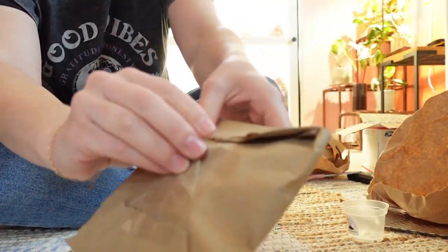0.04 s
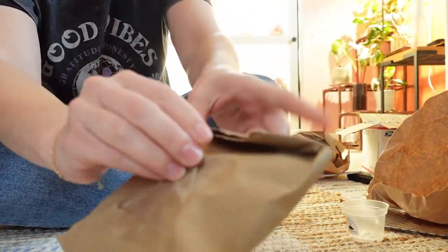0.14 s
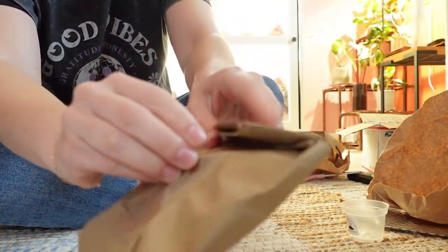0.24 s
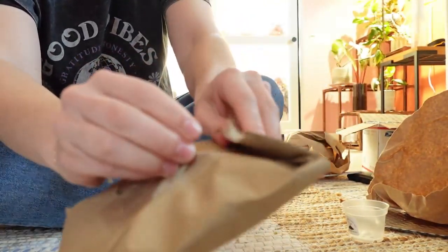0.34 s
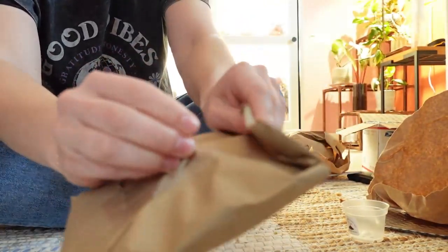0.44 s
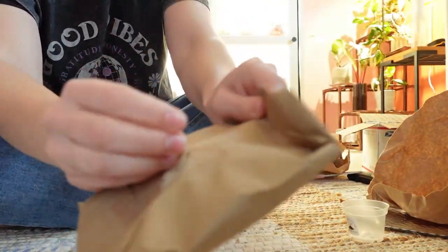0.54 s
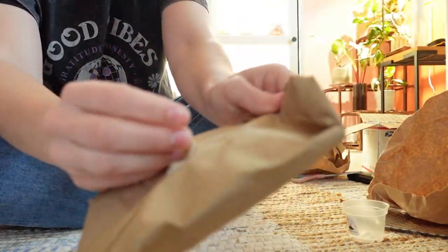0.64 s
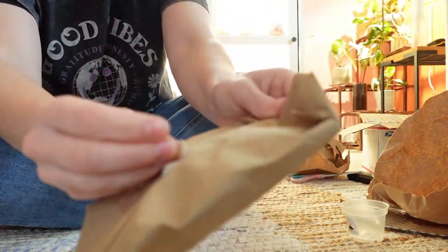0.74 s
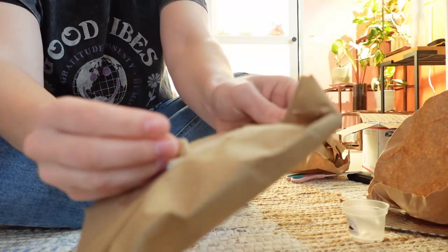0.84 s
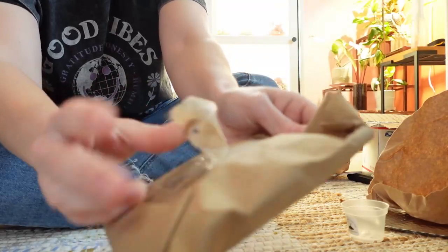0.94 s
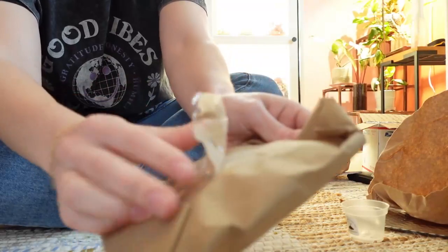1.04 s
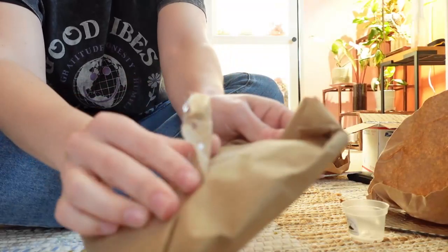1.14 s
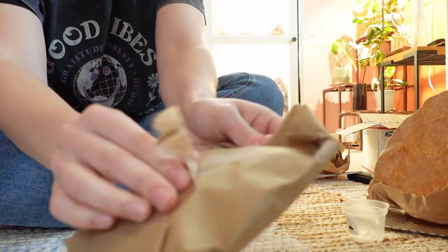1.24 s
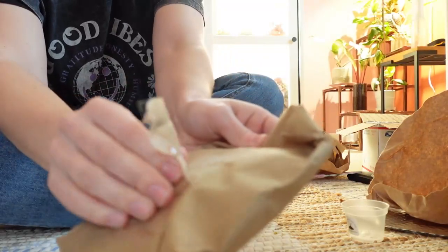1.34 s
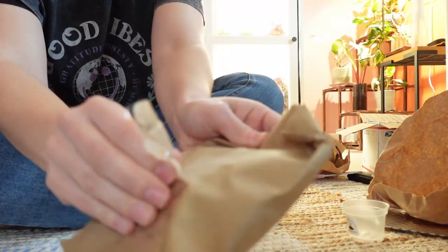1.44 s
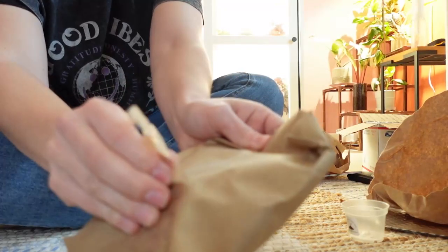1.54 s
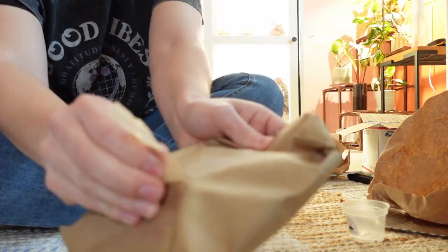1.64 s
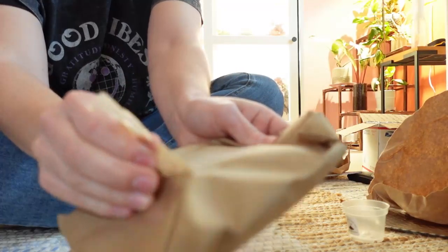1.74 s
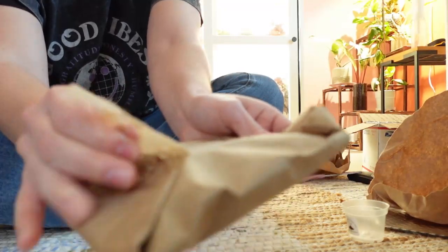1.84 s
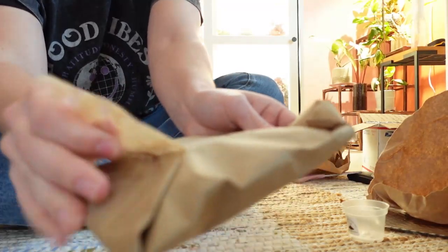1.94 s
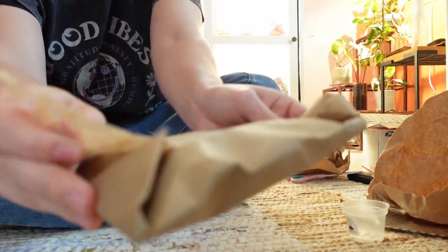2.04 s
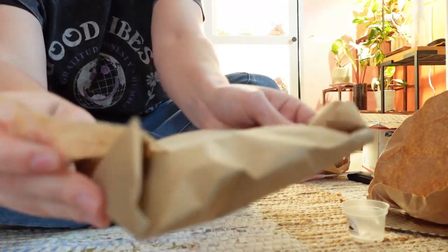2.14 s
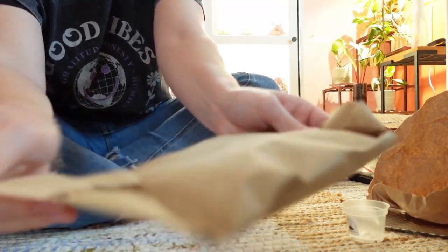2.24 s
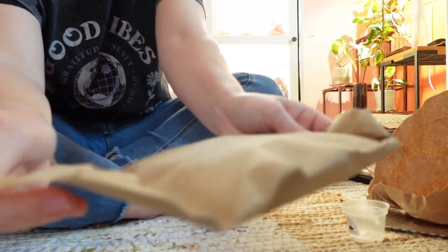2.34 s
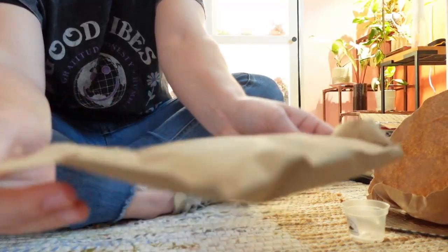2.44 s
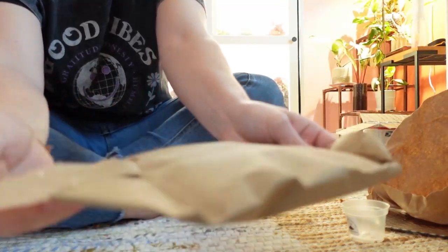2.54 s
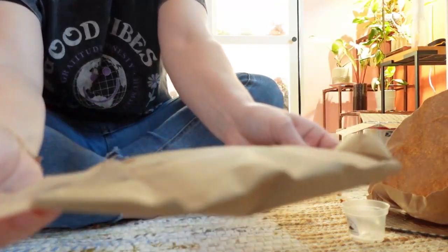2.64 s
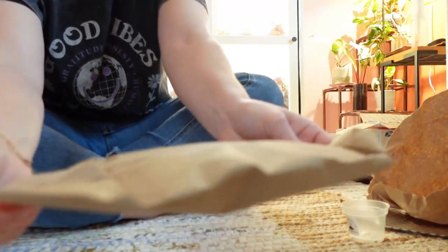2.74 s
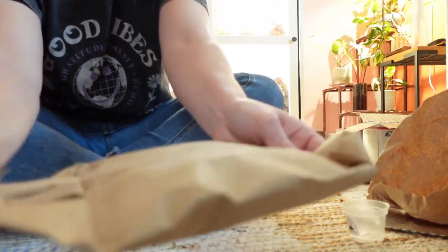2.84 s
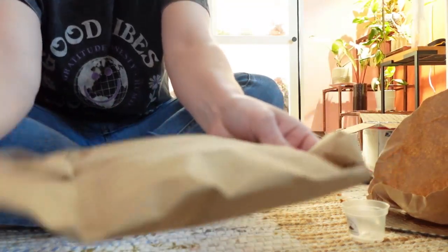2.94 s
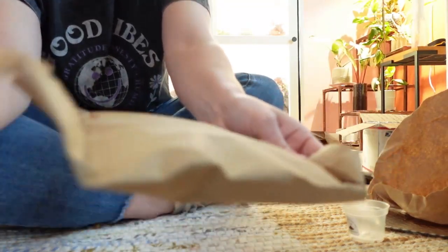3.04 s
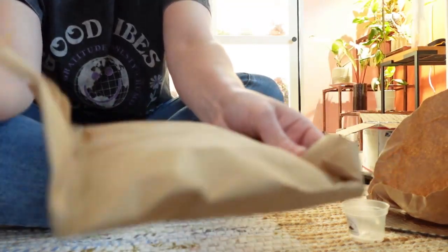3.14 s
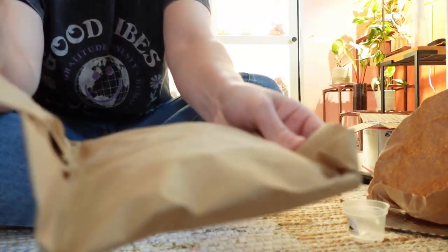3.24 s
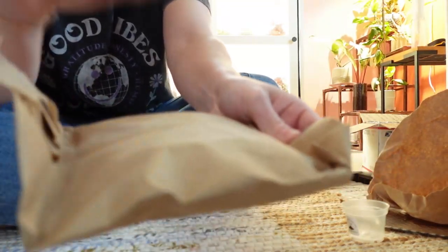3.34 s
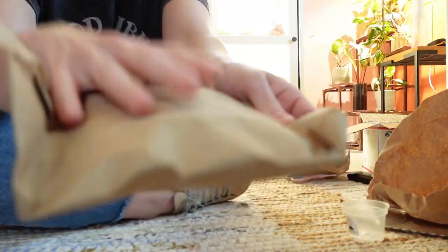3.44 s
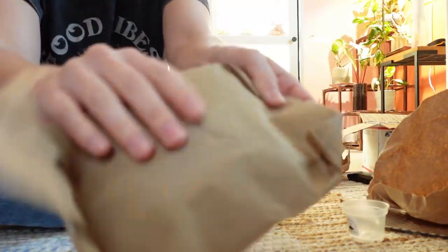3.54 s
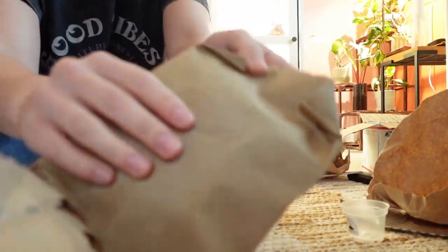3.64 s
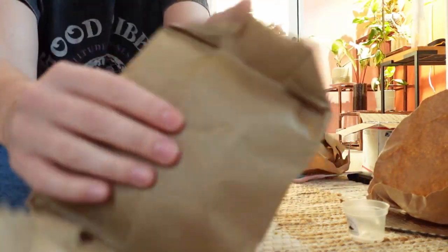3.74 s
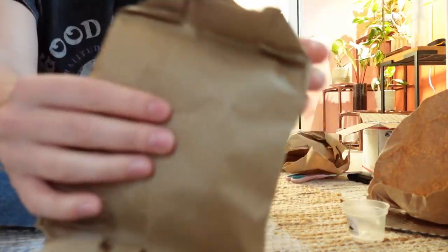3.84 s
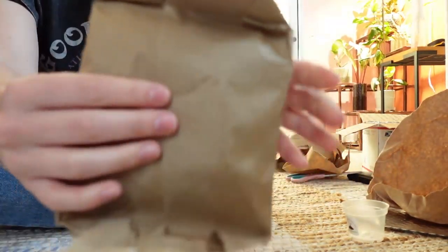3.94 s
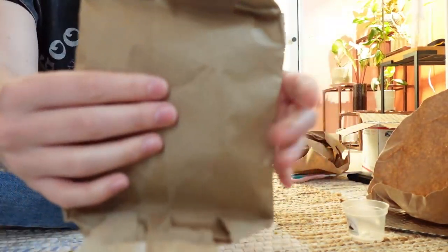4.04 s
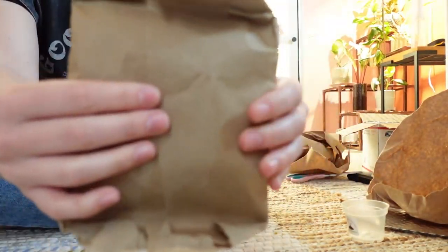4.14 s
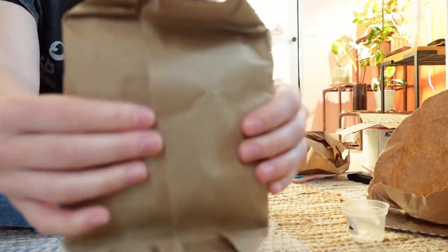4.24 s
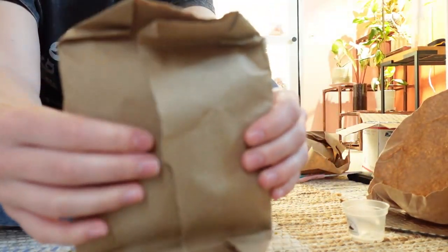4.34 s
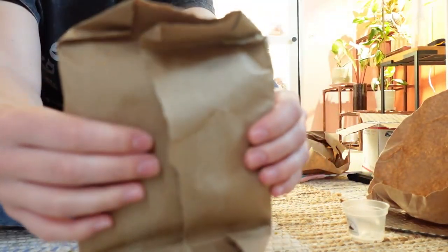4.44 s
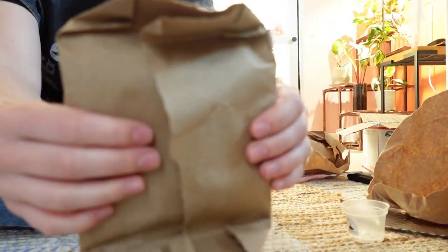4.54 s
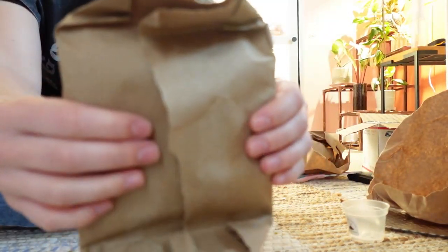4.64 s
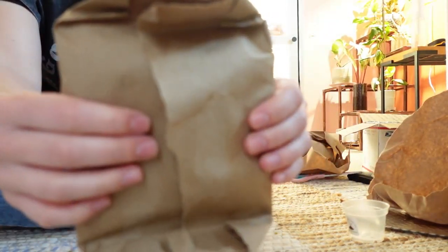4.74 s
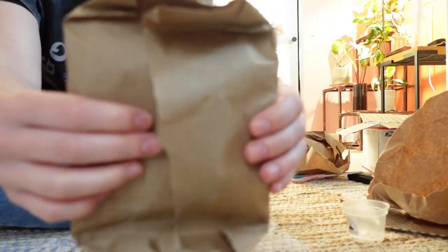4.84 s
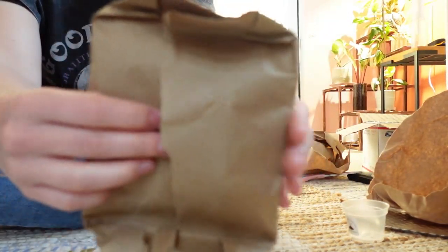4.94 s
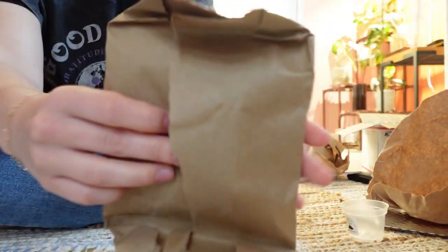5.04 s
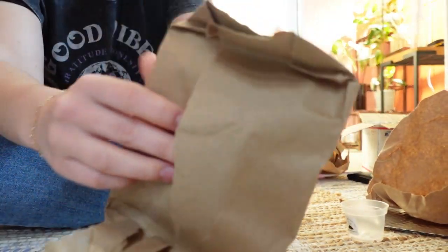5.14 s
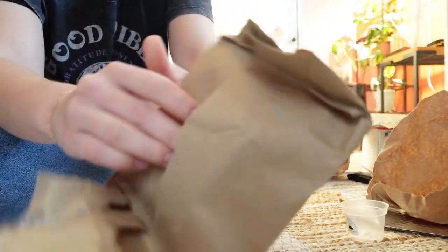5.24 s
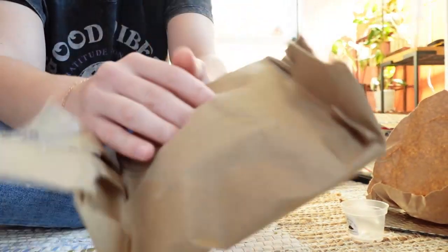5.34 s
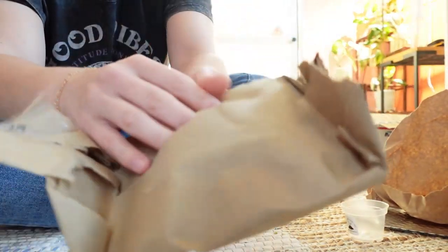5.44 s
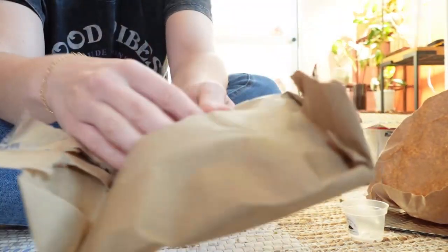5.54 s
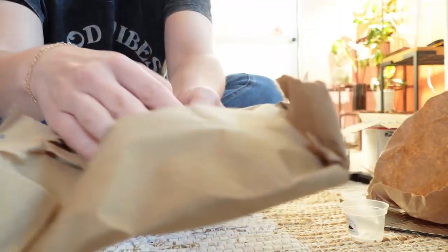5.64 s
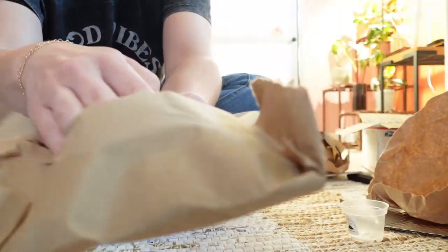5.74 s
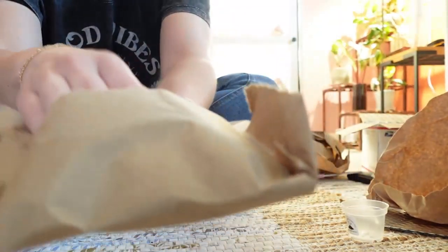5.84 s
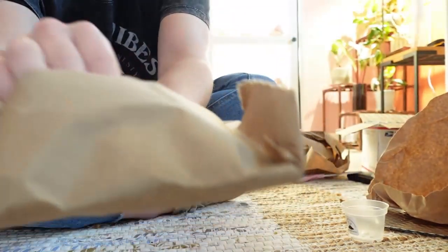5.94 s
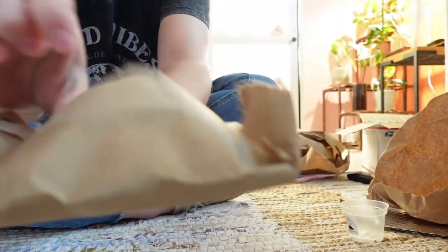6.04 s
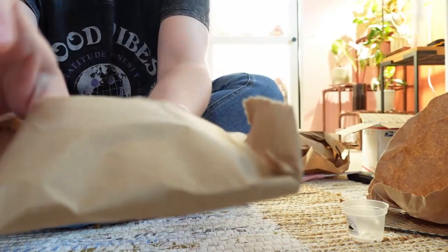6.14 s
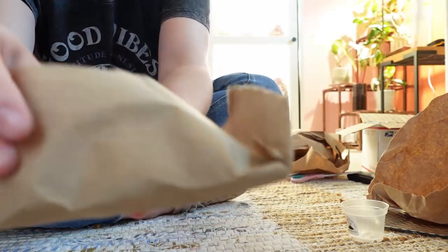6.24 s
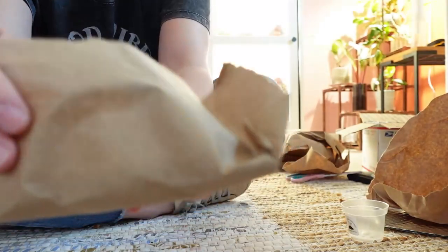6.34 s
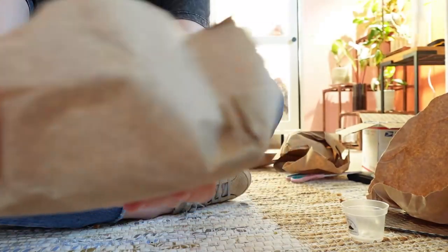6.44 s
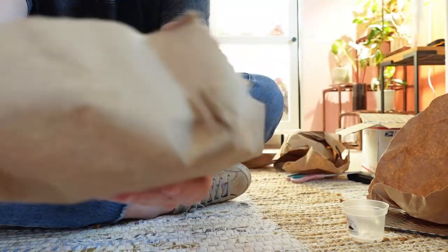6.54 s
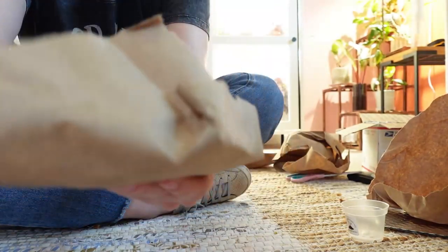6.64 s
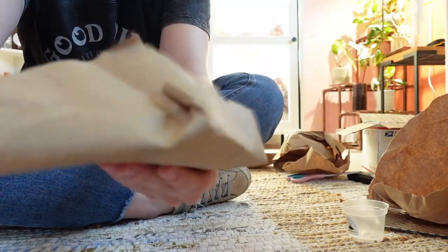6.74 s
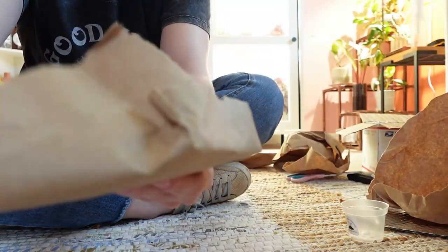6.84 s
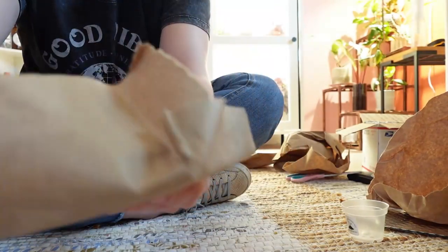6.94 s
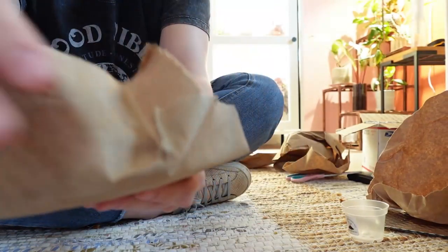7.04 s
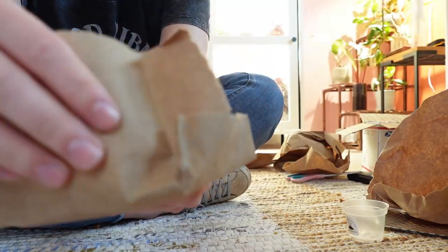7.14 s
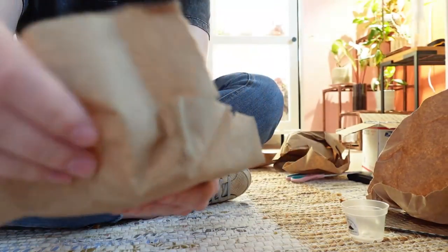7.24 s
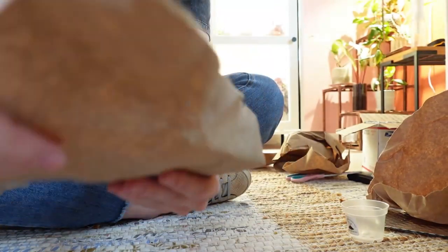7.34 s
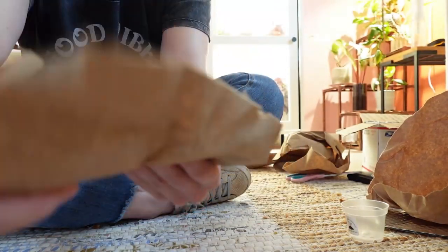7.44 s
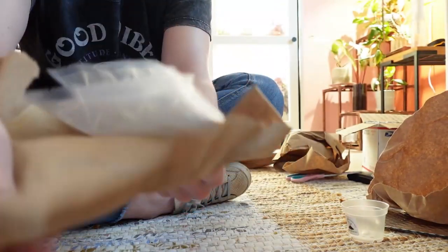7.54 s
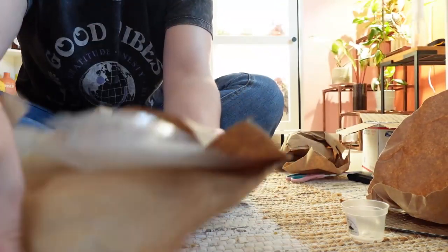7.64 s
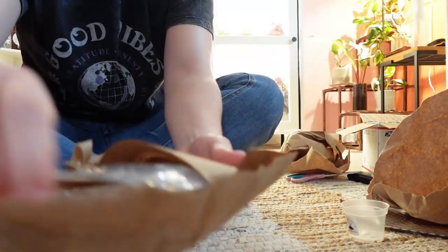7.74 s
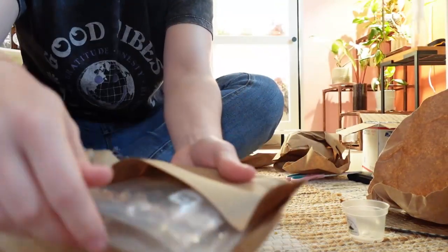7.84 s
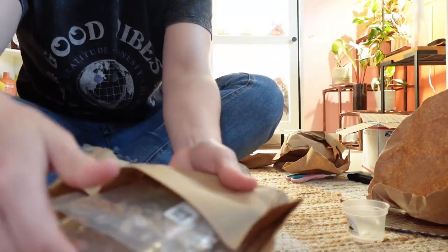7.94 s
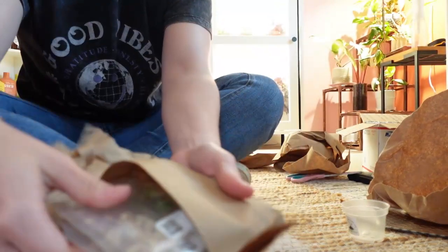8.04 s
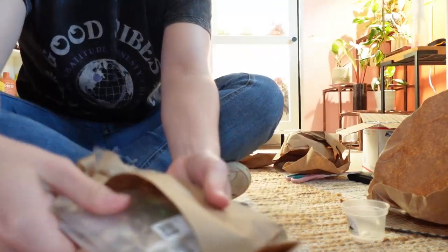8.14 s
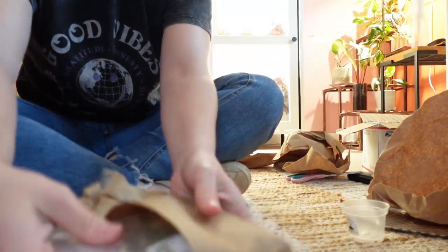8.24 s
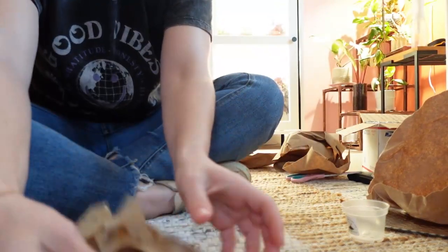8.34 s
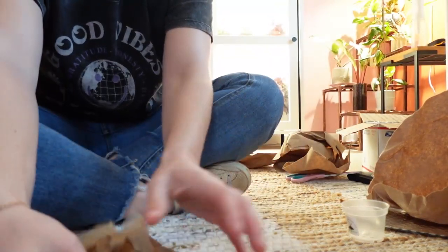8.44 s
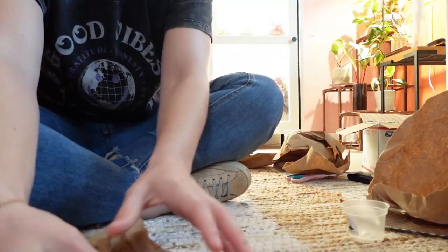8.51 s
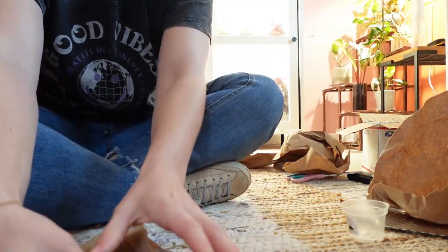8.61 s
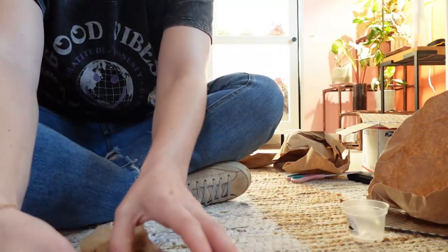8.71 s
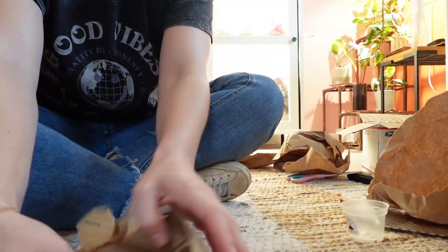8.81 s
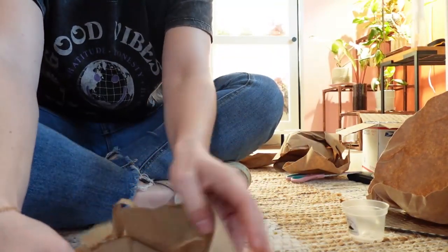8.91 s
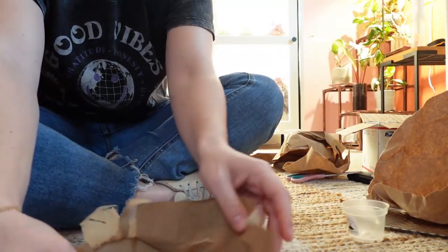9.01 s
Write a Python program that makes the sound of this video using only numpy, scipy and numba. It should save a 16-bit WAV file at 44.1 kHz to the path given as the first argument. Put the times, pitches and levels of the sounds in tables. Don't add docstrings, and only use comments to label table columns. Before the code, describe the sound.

A stiff paper bag crackles loudly close by as hands unfold it, rip off its tape, squeeze, open and lay it down indoors.

```python
import sys
import numpy as np
from scipy import signal
from scipy.fft import rfft, irfft, next_fast_len
from scipy.io import wavfile
from scipy.ndimage import uniform_filter1d
from numba import njit

SR = 44100
rng = np.random.default_rng(int(sys.argv[2]) if len(sys.argv) > 2 else 0)


def inscribe(sig):
    pcm = np.round(np.clip(np.atleast_2d(sig).T, -1, 1) * 32767)
    wavfile.write(sys.argv[1], SR, pcm.astype(np.int16))


def level_to_linear(level):
    exponent = np.asarray(level, float) / 20
    return 10 ** exponent


N = 400016


def snaps():
    s, peak_db, pitch_hz = creases()
    sounds = buckle(pitch_hz, focus_db=13, crisp_db=2.0, run_ms=1.2, ring=0.66, size=640)
    outline = np.sqrt(uniform_filter1d(abs(signal.hilbert(sounds)) ** 2, size=44))
    loudest, height = outline.argmax(1), outline.max(1)

    width_s = 0.031 / np.minimum(pitch_hz / 4.5, 1000)[:, None]
    u = (np.arange(640) - loudest[:, None]) / SR / width_s
    force = height * rng.uniform(-1, 1, len(s))
    sounds = sounds + 2 * force[:, None] * (1 - u ** 2) * np.exp(-u ** 2 / 2)

    starts = np.maximum(np.round(s * SR).astype(int) - loudest, 0)
    out = np.zeros(N)
    add(out, starts, level_to_linear(peak_db - 1.5) / height, np.arange(len(s)), sounds)
    return out


# time in seconds, peak level in dB, pitch of the paper patch in Hz.
EARLY_CREASES = [(0.0396, -10, 5240), (0.077, -9.5, 2040), (0.095, -20.5, 2900), (0.1039, -2, 5250),
                 (0.116, -28, 2900), (0.122, -7.5, 5400), (0.1452, -5.5, 2810), (0.2133, -2, 1775),
                 (0.2173, -8, 4900), (0.235, -14.5, 4100), (0.2822, -5.5, 6490), (0.306, -5, 4720),
                 (0.327, -8, 3080), (0.3867, -8.5, 1697), (0.4168, -11.5, 1700), (0.4465, -13.5, 2670),
                 (0.4677, -10, 2626), (0.5347, -6, 4130), (0.573, -6, 3460), (0.5997, -11.5, 3940),
                 (0.6184, -11.5, 1390), (0.627, -5.5, 5500), (0.6763, -6, 3120), (0.6835, -7.5, 2440),
                 (0.7181, -5, 3675), (0.8307, -9, 1140), (0.8884, -12.5, 3440), (0.9113, -8, 4770),
                 (0.9341, -12.5, 1950), (0.9519, -9, 1670), (0.9605, -6.5, 2840), (0.968, -19, 2160),
                (0.981, -10, 4160), (1.0014, -8, 2400), (1.0756, -6.5, 4395), (1.091, -20, 1610),
                (1.117, -26, 2750), (1.1273, -7.5, 2970), (1.2232, -12, 2370), (1.2697, -15.5, 1704),
                (1.326, -11, 6910), (1.333, -14, 4830), (1.3756, -13, 3220), (1.435, -19.5, 6400),
                (1.4792, -6.5, 1660), (1.507, -18.5, 1590), (1.5344, -6.5, 2780), (1.6198, -10, 4570),
                (1.64, -4, 4800), (1.643, -1.5, 3560), (1.663, -6, 5050), (1.739, -6.5, 2290),
                (1.768, -2.5, 5380), (2.411, -10, 3065), (2.422, -2, 4930), (2.443, -8.5, 4700),
                 (2.4574, -10.5, 1410), (2.542, -16, 1626), (2.5932, -13.5, 9450), (2.632, -13.5, 1830),
                  (2.659, -13.5, 4050), (2.696, -4.5, 4570), (2.7505, -9, 2716), (2.791, -16, 3730),
                  (2.827, -7.5, 3304), (2.885, -12, 2600), (2.8979, -7.5, 1963), (2.9556, -13.5, 2320),
                  (2.9749, -6.5, 3020), (3.0178, -8, 3650), (3.0312, -8.5, 1325), (3.151, -11.5, 2444),
                  (3.167, -7.5, 3700), (3.188, -7.5, 5120), (3.192, -4.5, 3580), (3.212, -2.5, 6500),
                  (3.493, -25, 6430), (3.536, -9, 2180), (3.603, -7.5, 2980), (3.6303, -4, 2950),
                  (3.65, -10, 1920), (3.6732, -3.5, 4260), (3.676, -10, 3370), (3.69, -6, 3840),
                  (3.725, -10.5, 2414),
                 (3.7501, -4, 2358), (3.7775, -5.5, 3080), (3.793, -6, 2760), (3.8344, -3, 3950),
                   (3.841, -5.5, 3260), (3.985, -16.5, 3720), (4.0366, -16, 3830), (4.074, -21, 3090),
                   (4.2203, -8, 4580), (4.2476, -7.5, 2860), (4.287, -8, 3300), (4.3002, -7, 2710),
                   (4.3306, -7, 2940), (4.3609, -7.5, 2920), (4.4466, -15.5, 3200), (4.533, -11.5, 2000),
                   (4.8037, -12, 2306), (4.8563, -17, 3000), (4.88, -11.5, 2900), (4.912, -8, 3534),
                   (4.9274, -8.5, 3385), (4.943, -4, 4300), (5.032, -11.5, 1820), (5.0535, -14, 1720),
                   (5.1386, -7.5, 2900), (5.156, -8, 3180), (5.1643, -7, 3390), (5.2605, -13, 2000),
                   (5.311, -13, 2930), (5.3396, -4.5, 3567)]
LATE_CREASES = [(5.364, -9.5, 2960), (5.383, -15.5, 2280), (5.4, -12, 3230), (5.5783, -8.5, 1990),
                (5.619, -10.5, 1890), (5.679, -6, 2584), (5.686, -6, 2610), (5.8246, -1.5, 4440),
                (5.838, -5, 2724), (5.8676, -1.5, 2910), (5.9529, -13, 1166), (6.0869, -3, 1230),
                (6.264, -4.5, 2730), (6.37, -6.5, 1690), (6.4323, -1, 1580), (6.511, -3.5, 2880),
                (6.558, -1, 3360), (6.6689, -1, 1510), (6.704, -2.5, 1995), (6.742, -2.5, 1904),
                (6.803, -7, 1720), (6.8826, -7, 2010), (6.8876, -6, 1760), (6.936, -2.5, 1868),
                (6.9565, -13.5, 2180), (7.0994, -9.5, 1840), (7.107, -7, 4050),
                (7.1538, -2, 1770), (7.2008, -5, 1756), (7.2426, -1.5, 1630), (7.253, -1.5, 3180),
                 (7.286, -10, 2050), (7.3094, -4.5, 2806), (7.364, 0, 2987), (7.4, -4.5, 1590),
                 (7.416, -6.5, 4410), (7.4898, -3.5, 3440), (7.5461, -8.5, 5470), (7.601, -12, 1724),
                 (7.6305, -6.5, 4300), (7.6492, -7, 4550), (7.6586, -4.5, 2335), (7.667, -9, 3970),
                 (7.686, -3, 2415), (7.7208, -5.5, 2046), (7.7313, -5, 2286), (7.8201, -6.5, 2510),
                 (7.957, -16.5, 3600), (7.977, -15.5, 1720), (8.029, -6.5, 3770),
                (8.051, -1, 2580), (8.0733, -8, 3120), (8.092, -7, 2300), (8.1155, -6.5, 3300),
               (8.156, 2.5, 2150), (8.1838, -0.5, 2150), (8.258, -9, 2090), (8.2638, -2.5, 3580),
               (8.2962, -8.5, 3320), (8.328, -8, 3160), (8.437, -6.5, 1895), (8.483, -2, 1630),
               (8.5149, -7, 3100), (8.574, -15.5, 2930), (8.6513, -14, 4550), (8.673, -14, 5090),
               (8.718, -13.5, 2420), (8.7394, -12.5, 2250), (8.768, -16.5, 1096), (8.772, -15.5, 3260),
               (8.819, -15, 1950), (8.903, -9, 1890), (8.931, -5.5, 2940), (8.9351, -5.5, 2550),
               (9.0024, -9, 2720), (9.052, -5, 4600)]
MORE_CREASES = [(0.0091, -12.5, 2135), (0.0209, -12, 2490), (0.035, -7, 4330), (0.064, -9.5, 2930),
                (0.139, -9, 4785), (0.182, -26, 2520), (0.188, -19, 2480), (0.241, -10, 7030),
                (0.2475, -6, 4080), (0.288, -21, 5080.0), (0.3335, -15, 8400), (0.399, -27, 1900),
                (0.402, -22.5, 4870), (0.5053, -14, 3430), (0.5866, -8, 6910), (0.6148, -2.5, 5180),
                (0.636, -5, 4950), (0.6572, -6, 6410), (0.7776, -14.0, 7350), (0.9437, -7.5, 6400),
                (0.992, -30, 7990), (1.0277, -17.5, 6200), (1.1027, -17, 2210), (1.1132, -27, 2720),
                (1.194, -21.5, 3040), (1.233, -19, 2930), (1.258, -27.5, 3970.0), (1.279, -19, 3580),
                (1.2854, -28, 5800), (1.2941, -15, 8020), (1.3, -25.5, 5770.0), (1.3187, -25.5, 6670.0),
                (1.3875, -30, 7260.0), (1.4058, -26, 1870), (1.464, -14.5, 3210.0), (1.562, -11.5, 6020),
                (1.6502, -8, 6770), (1.7331, -6, 6200), (1.794, -5.5, 4220), (1.9304, -18, 4200),
                (2.089, -7, 1320), (2.398, -5, 3380), (2.4647, -17.5, 2380), (2.469, -19.5, 2630.0),
                (2.5508, -23.5, 2160), (2.5858, -34, 5430), (2.672, -7, 6460), (2.7232, -10.5, 4820),
                (2.7275, -17.5, 3320.0), (2.7808, -13.5, 3000), (2.8928, -22.5, 4270),
                (2.9108, -13, 2750.0), (2.9638, -16, 6940), (2.966, -15.5, 7600), (3.0243, -19.5, 4530),
                        (3.0439, -11.5, 3060), (3.0826, -27, 6850), (3.1018, -26, 3780), (3.1237, -34.5, 5030.0),
                        (3.1379, -14, 2820.0), (3.456, -29, 5550), (3.5438, -7, 5220), (3.556, -7.5, 3330),
                        (3.588, -9.5, 5660), (3.6426, -12, 4400), (3.704, -24, 4890.0), (3.7855, -21, 3940),
                        (3.8127, -14.0, 4260), (4.011, -23.5, 4590), (4.0676, -31, 1320), (4.135, -25, 5830),
                        (4.1417, -33, 4020.0), (4.2354, -11, 2910), (4.241, -18.5, 3470), (4.31, -6.5, 3710),
                        (4.49, -21.5, 1740), (4.5557, -27.5, 2030), (4.5928, -25.0, 2620), (4.6065, -31.5, 4700),
                        (4.6286, -38, 5070), (4.6399, -37.5, 1630), (4.6484, -38.5, 3110.0), (4.9602, -16, 3930),
                        (5.0876, -25.5, 1800), (5.109, -21.5, 2950), (5.121, -18.5, 3500), (5.2046, -15.5, 1280),
                        (5.2168, -16.5, 2600), (5.232, -16.5, 1510), (5.2367, -13.5, 1406), (5.2492, -29.5, 4640),
                        (5.276, -18, 3190), (5.2917, -24.5, 2360), (5.2976, -21.5, 3670), (5.356, -26, 3500),
                        (5.4498, -23, 2940), (5.5897, -8, 2526), (5.6647, -14.5, 4090.0), (5.7249, -12.5, 1970),
                        (5.744, -10, 3780), (6.0268, -20, 4000), (6.331, -9.5, 2440), (6.358, -10, 9950),
                        (6.373, -8, 6820), (6.449, -11.5, 3270.0), (6.4907, -5, 3940),
                (6.532, -7.5, 1456), (6.5527, -4, 3630), (6.5745, -10, 1960), (6.611, -9.5, 1480),
                         (6.6345, -4.5, 4620), (6.711, -8.5, 3820.0), (6.7277, -2, 2710), (6.7489, -3.5, 3610),
                         (6.825, -4.5, 4830), (6.874, -12, 2203), (6.948, -13.5, 1646), (6.954, -12.5, 2980),
                         (7.1191, -9.5, 3350), (7.192, -8, 3050), (7.2123, -13, 2267), (7.2343, -19.5, 3570),
                         (7.2476, -8, 4300), (7.259, -36, 3430), (7.339, -3.5, 6080), (7.346, -18, 4660),
                         (7.3592, -6, 4820), (7.3913, -6, 2820), (7.406, -2.5, 3660), (7.4401, -1.5, 3824),
                         (7.469, -23, 3600), (7.473, -2.5, 6460), (7.5114, -2, 4435), (7.6137, -8.5, 2860),
                         (7.642, 2, 5390), (7.7677, -8.5, 4860), (7.777, -7.5, 2900), (7.889, -19, 7440),
                         (7.902, -26.5, 6840), (7.9164, -13.5, 3600), (7.939, -14, 5580.0), (7.993, -13, 3850),
                         (8.0097, -21.5, 4960), (8.048, -8, 4870), (8.057, -5, 3750), (8.101, -14, 2520),
                         (8.1325, -13.5, 5280), (8.2479, -11.5, 3710), (8.3153, -25.5, 2460), (8.345, -14, 3984),
                         (8.3746, -18.5, 5710), (8.403, -17.5, 2715), (8.4574, -9, 2990), (8.493, -6, 2494),
                         (8.567, -28, 2940), (8.943, -15, 3930), (8.99, -17, 6100), (9.0173, -12.5, 6030),
                         (9.0378, -12.5, 3040), (9.06, -21, 3300)]


def creases():
    picks = EARLY_CREASES
    picks = picks + LATE_CREASES
    return np.transpose(picks + MORE_CREASES)


# pitch in Hz, level in dB per Hz.
SHEET_COLOUR = [(88, -47), (150, -23.5), (425, -6.5), (477, -13), (578, -5.5), (972, -0.5), (1540, 2),
                (5200, -3.5), (15000, -16.5)]
# pitch in Hz, time to fade by 60 dB in milliseconds.
SHEET_RING = [(200, 54), (1000, 14.86), (3000, 9.2), (8000, 8.6), (16000, 6.1)]


def buckle(pitch_hz, focus_db, crisp_db, run_ms, ring, size):
    place, wait, weak, phase = np.moveaxis(rng.random((len(pitch_hz), 40, 4)), 2, 0)[..., None]
    hz = 16000 * ((np.arange(40)[:, None] + place) / 40) ** 2 + 120
    pitch_hz = pitch_hz[:, None, None]

    late = 2 * wait - 0.8
    run_s = run_ms / pitch_hz * 2 * (0.3 + weak[:, :1])
    t = np.maximum(np.arange(size) / SR - run_s * (late ** 3 + 0.8 ** 3), 0)

    octaves = np.log2(hz / pitch_hz)
    patch_db = focus_db * np.exp(-(octaves / 0.36) ** 2)
    tilt_db = crisp_db * np.log2(pitch_hz / 2500) * np.log2(hz / 2500)
    tilt_db = tilt_db - 4.8 * np.maximum(octaves - 1, 0) ** 2
    tilt_db = tilt_db - 2.5 * np.clip(-octaves - 0.6, 0, 2)

    sheet_db = read(SHEET_COLOUR, hz) + 7.8 * np.log10(hz)
    height_db = sheet_db + patch_db + tilt_db - 10 * weak - 9 * abs(late)
    fade_db = 60000 * t / (ring * read(SHEET_RING, hz))
    onset = np.minimum(t * hz * 0.88, 1)
    tones = level_to_linear(height_db - fade_db) * onset * np.sin(2 * np.pi * (hz * t + phase))
    return tones.sum(1)


def rustle():
    level_db, crisp = handling()
    grain = graininess(level_db)
    slips_per_s = 3600
    clump = level_to_linear((0.6 + 1.6 * grain) * drift(hz=40))
    luck, picks = rng.random((N, 2)).T
    size_db = level_db - 7.0 * grain - 3.7 * grain * np.log(picks + 0.0023)
    size = level_to_linear(size_db) * clump * np.sqrt(SR / slips_per_s)
    starts = np.flatnonzero(luck < slips_per_s / SR)

    stock_hz = np.geomspace(500, 13000, 500)
    sounds = buckle(stock_hz, focus_db=4.5, crisp_db=2.0, run_ms=1.451, ring=0.73, size=500)
    sounds /= np.linalg.norm(sounds, axis=1)[:, None]

    octaves = 0.35 * crisp + 0.15 * np.log(picks) + 0.8 * rng.standard_normal(N)
    kinds = np.searchsorted(stock_hz, 3400 * 2 ** octaves).clip(0, len(sounds) - 1)
    signed_size = size * rng.choice([-1, 1], N)
    out = np.zeros(N)
    add(out, starts, signed_size[starts], kinds[starts], sounds)
    return out


# full strength at seconds, held for seconds, rustle level in dB, crispness from dull (-1) to crisp (4).
MOVES = [(0.01, 0.14, -25.5, 2), (0.232, 0.2, -26.5, 2), (0.526, 0.19, -24, 2),
         (0.622, 0.01, -20.5, 2.5), (0.786, 0.041, -18.5, 3.5), (0.958, 0.02, -25, 3),
         (1.089, 0.07, -36, 1), (1.232, 0.049, -32, 1.2), (1.375, 0.037, -39.5, 3.5),
         (1.452, 0.061, -31, 3), (1.545, 0.712, -28, 2.5), (1.652, 0.084, -20.5, 3),
         (1.817, 0.097, -17.5, 2.2), (1.989, 0.14, -16, 3.5), (2.185, 0.15, -15, 2.5),
         (2.419, 0.0047, -30.5, 0), (2.544, 0.015, -35.5, 1.3), (2.676, 0.038, -22.5, 2),
         (2.827, 0.03, -38, 1), (2.903, 0.016, -28, 1), (2.958, 0, -29, 2), (3.037, 0, -26.5, 1.35),
         (3.134, 0.036, -33, -1.1), (3.208, 0.0, -27.5, 4), (3.424, 0.18, -48, 3.5),
         (3.562, 0.014, -21.5, 3), (3.625, 0.02, -24, 1.5), (3.713, 0.053, -28.5, 2),
         (3.818, 0.014, -25, 3), (3.901, 0.023, -32.5, 1.5),
         (4.155, 0.0088, -35, 3), (4.229, 0.13, -29.5, 2), (4.434, 0.03, -34, 1.6),
              (4.876, 0.25, -34, 2.5), (5.112, 0.08, -31.5, 2), (5.326, 0.14, -38, 1.5),
              (5.507, 0.036, -29, 2), (5.585, 0.0091, -21, 1.33), (5.69, 0.078, -26.5, 1),
              (5.853, 0.093, -28.5, 1.3), (6.029, 0.28, -27, 2.2), (6.078, 0.026, -17, 0.5),
              (6.331, 0.089, -24, 0.5), (6.356, 0.018, -19, 2.5), (6.453, 0.015, -17.5, 1),
              (6.575, 0.088, -19, 0.2), (6.665, 0.13, -21, -0.26), (6.778, 0.022, -17.5, 0.7),
              (6.915, 0.14, -25.5, 0.5), (7.11, 0.023, -24.5, 1.5), (7.2, 0.0015, -25, -0.45),
              (7.255, 0.016, -21.5, 1.5), (7.331, 0.000074, -17, 1.45), (7.43, 0.1, -20, 1),
              (7.618, 0.17, -24, 0.75), (7.917, 0.035, -29, 1), (8.053, 0.14, -24, 0.86),
              (8.224, 0.13, -29, 1.16), (8.443, 0.02, -19, -0.5), (8.622, 0.038, -34, 1),
              (8.725, 0.19, -35.5, -0.5), (8.884, 0.95, -28, 1.7), (8.93, 0.0057, -23.5, -0.5)]


def handling():
    swell_db_per_s, settle_db_per_s = 549, 200
    plain_crisp, crisp_gain = 1.1, 1.3
    start, held, db, crisp = np.transpose(MOVES)[..., None]
    t = np.arange(0, N / SR + 0.01, 0.002)
    swell_db = swell_db_per_s * np.maximum(start - t, 0)
    settle_db = settle_db_per_s * np.maximum(t - start - held, 0)
    moves = level_to_linear(db - swell_db - settle_db) ** 2
    power = moves.sum(0)

    s, peak_db, pitch_hz = creases()[..., None]
    away_s = np.maximum(t - s, 3.5 * (s - t))
    flurry = level_to_linear(peak_db - 18 - 914 * away_s) ** 2
    patch = (flurry * 2.6 * np.log2(pitch_hz / 3000)).sum(0)

    total = power + flurry.sum(0)
    level_db = 10 * np.log10(total)
    crispness = (crisp_gain * ((moves * crisp).sum(0) - plain_crisp * power) + patch) / total
    seconds = np.arange(N) / SR
    return np.interp(seconds, t, level_db), np.interp(seconds, t, crispness)


# time in seconds, graininess from even (0) to separate grains (1).
GLUE_GRAIN = [
    (1.64, 1),
    (1.74, 0),
    (2.38, 0),
    (2.45, 1),
]


def graininess(level_db):
    merged = np.clip(2.5 - 0.68 * (level_db + 21), 0, 1)
    glue = np.interp(np.arange(N) / SR, *np.transpose(GLUE_GRAIN))
    return np.minimum(glue, merged)


def cavity(x):
    hz, t, z = signal.stft(x, SR, nperseg=256)
    taut_s, taut_half_s, taut_hz, taut_db = 1.875, 0.07, 1800, 6.5
    off_time = ((t - taut_s) / taut_half_s) ** 4
    off_pitch = (np.log2(hz[:, None] / taut_hz + 1e-9) / 0.35) ** 2
    z = z * level_to_linear(taut_db * np.exp(-off_time - off_pitch))

    folds = uniform_filter1d(rng.standard_normal(z.shape), size=5, axis=0)
    folds = uniform_filter1d(folds, size=36, axis=1)
    folds_db = 2.0 * evened(folds) * np.exp(-hz / 7000)[:, None]
    return signal.istft(z * level_to_linear(folds_db), nperseg=256)[1][:N]


# pitch in Hz, time to fade by 60 dB in seconds.
ROOM_RING = [(200, 1), (1500, 0.74), (5000, 0.54), (16000, 0.49)]


def room(x):
    hz, t, z = signal.stft(rng.standard_normal((2, 3, SR // 2)), SR, nperseg=256)
    fade = level_to_linear(-60 * t / read(ROOM_RING, hz)[:, None])
    tail = signal.istft(z * fade, SR, nperseg=256)[1]
    tail = tail * np.clip(np.arange(tail.shape[-1]) / SR / 0.0012, 0, 1)
    tail = tail / np.linalg.norm(tail[0])
    turn = np.cos(2 * np.pi * (np.arange(N) / SR * 23 + np.arange(3)[:, None] / 3))
    return signal.oaconvolve((x * turn)[None], tail, axes=2).sum(1)[:, :N]


# pitch in Hz, level in dB per Hz.
HUSH_COLOUR = [(24, -69), (40, -16), (262, -6.5), (337, -9.5), (16000, -24.5)]


def hush():
    return level_to_linear(-58.5) * evened(colour(rng.standard_normal((2, N)), HUSH_COLOUR))


# pitch in Hz, difference in dB under their sum.
PORT_DIFFERENCE = [(60, -23), (180, -27), (550, -18.5), (1650, -26.5), (4970, -11), (15000, -21)]


def between_ports(paper, wet):
    quarter_turn = signal.hilbert(paper, next_fast_len(N))[:N].imag
    lag = quarter_turn * drift(hz=25.2) * drift(hz=17.0)
    return colour(level_to_linear(-1.0) * lag + level_to_linear(-4.5) * wet, PORT_DIFFERENCE)


def evened(x):
    return x / np.sqrt(np.mean(x ** 2) + 1e-20)


def read(points, hz):
    f, value = np.transpose(points)
    return np.interp(np.log(hz + 1), np.log(f + 1), value)


def colour(x, points):
    size = next_fast_len(N)
    gain = level_to_linear(read(points, np.fft.rfftfreq(size, 1 / SR)))
    return irfft(rfft(x, size) * gain, size)[..., :N]


def drift(hz):
    return evened(signal.lfilter([1], [1, -np.exp(-2 * np.pi * hz / SR)], rng.standard_normal(N)))


@njit
def add(mix, starts, sizes, kinds, sounds):
    for start, size, kind in zip(starts, sizes, kinds):
        for k in range(min(sounds.shape[1], len(mix) - start)):
            mix[start + k] += size * sounds[kind, k]


def scene():
    paper = snaps() + cavity(rustle())
    wet = room(paper)
    noise = hush()
    mid = paper + level_to_linear(-16.5) * wet[0] + noise[0]
    side = between_ports(paper, wet[1]) + level_to_linear(-4.5) * noise[1]
    return np.array([mid + side, mid - side])


def limiter(x):
    power_db = 10 * np.log10(uniform_filter1d((x ** 2).mean(0), size=40).clip(1e-12))
    fall = np.arange(N) * 710.0 / SR
    held_db = np.maximum.accumulate(power_db + fall) - fall
    over_db = np.maximum(held_db - 7.5, 0)
    ceiling = 0.76
    heard = x / level_to_linear(0.17 * uniform_filter1d(over_db, size=60)) / ceiling
    return ceiling * heard / (1 + heard ** 4) ** (1 / 4)


# pitch in Hz, gain in dB.
MICROPHONE_COLOUR = [(30, -24), (80, -7.5), (200, 1.5), (15500, 0), (15900, -38)]


def microphone(x):
    return colour(x, MICROPHONE_COLOUR)


def low_pass(x):
    return signal.sosfilt(signal.butter(12, 16810, fs=SR, output="sos"), x)


def record(dry):
    mix = microphone(limiter(dry))
    return low_pass(mix)


dry = scene()
out = record(dry)
inscribe(out)
```